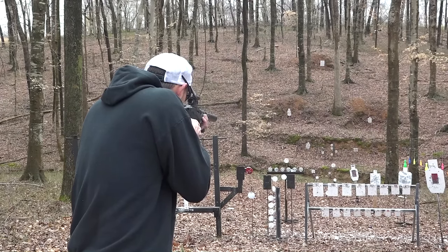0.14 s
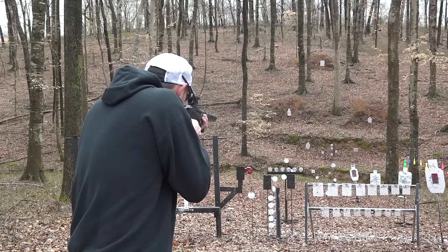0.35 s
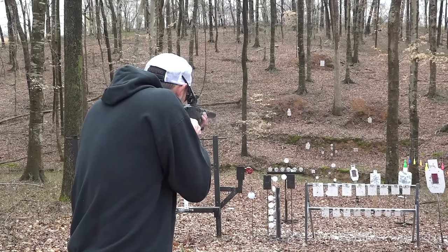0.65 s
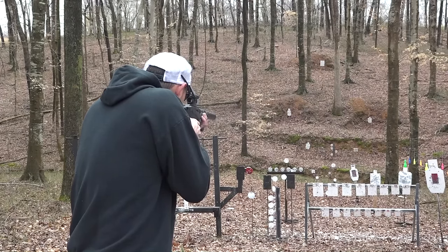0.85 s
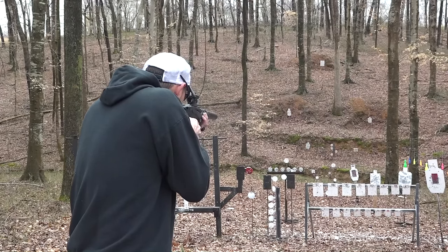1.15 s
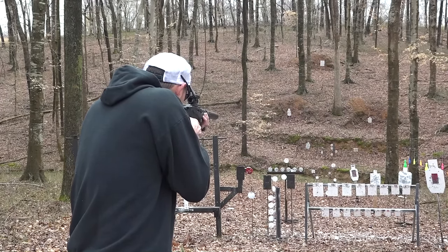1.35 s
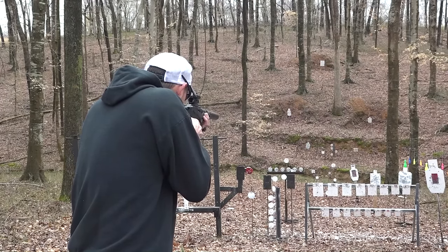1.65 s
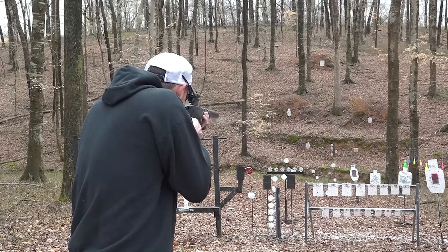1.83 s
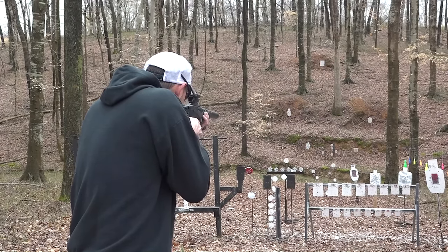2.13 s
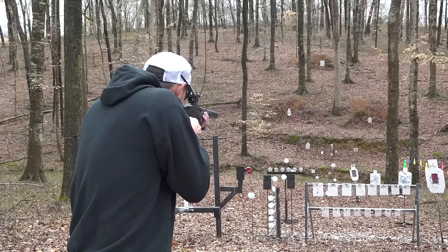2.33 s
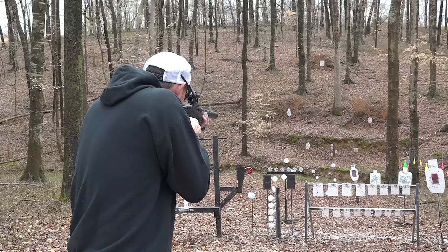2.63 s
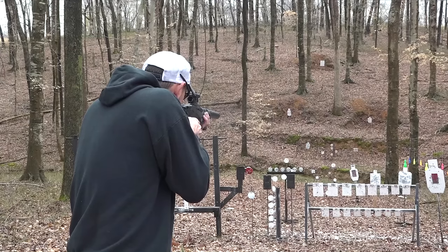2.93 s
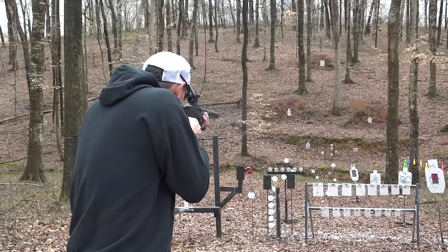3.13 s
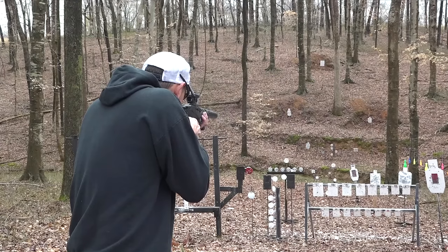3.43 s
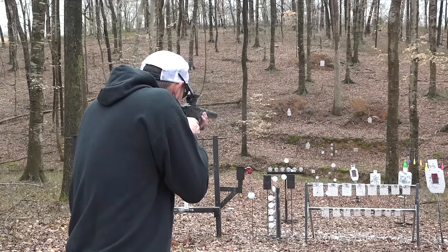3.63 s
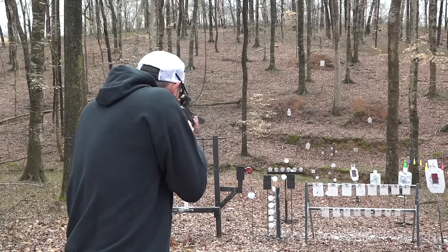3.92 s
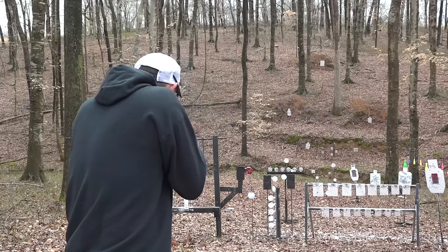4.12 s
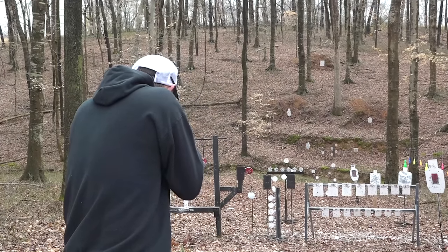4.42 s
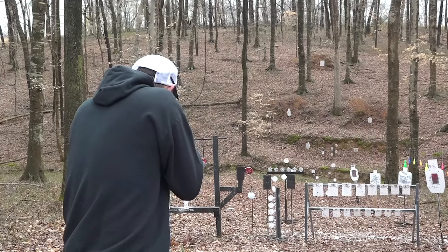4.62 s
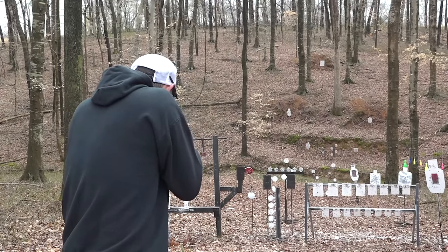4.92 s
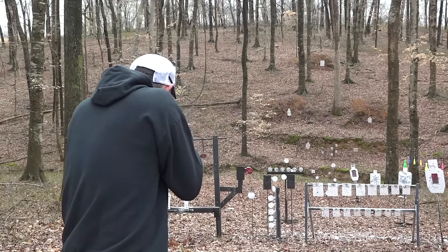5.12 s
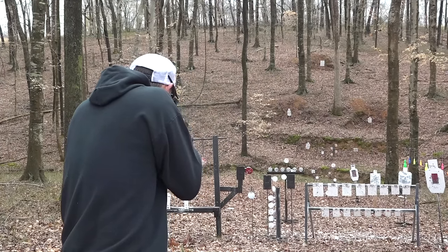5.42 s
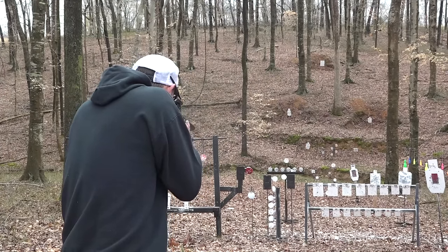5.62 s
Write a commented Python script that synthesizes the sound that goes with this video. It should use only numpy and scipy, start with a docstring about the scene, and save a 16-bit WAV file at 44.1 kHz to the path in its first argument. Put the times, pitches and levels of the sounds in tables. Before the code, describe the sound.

A suppressed semi-automatic gun fires six shots in the woods, with bullets pinging off distant metal plates, then clanging on nearer ones.

```python
"""Suppressed pistol and steel plates

A semi-automatic pistol is fired six times in a bare forest, while an earlier shot still echoes.
Each shot is a muzzle thump, a hiss of gas and the clatter of the bolt, close enough to overload the
microphone. Bullets excite the bending modes of near and far plates or land in the soil, spent cases
drop and ring, and trunks and hillside reflect the shots and hits."""
import sys
import numpy as np
from scipy import signal
from scipy.fft import rfft, irfft
from scipy.io import wavfile

SR = 44100
rng = np.random.default_rng(int(sys.argv[2]) if len(sys.argv) > 2 else 0)


def transcribe(signal):
    """Save signal, clipped to [-1, 1], as a 16-bit WAV file at the path in sys.argv[1]."""
    frames = np.atleast_2d(signal).T
    limited = np.clip(frames, -1, 1)
    pcm = np.round(limited * 32767).astype(np.int16)
    wavfile.write(sys.argv[1], SR, pcm)


N = 254016
LEAD = SR // 4  # samples before t = 0, which hold the earlier shot
BULLET_M_S, SOUND_M_S = 300, 343
TOP_HZ = 15900


def undb(db):
    """Amplitude ratio: tenfold for every 20 dB."""
    return 10 ** (np.asarray(db) / 20)


def clock(seconds):
    """Uniform sampling instants, t/s."""
    return np.arange(int(seconds * SR)) / SR


def fade(t, t60):
    """Exponential decay: 60 dB in the time t60."""
    return np.exp(-np.log(1000) * t / max(t60, 1e-3))


def add(track, start_s, sound):
    """Superposition on a track that begins LEAD samples before t = 0."""
    i = max(LEAD + int(round(start_s * SR)), 0)
    part = sound[:max(len(track) - i, 0)]
    track[i:i + len(part)] += part


def butterworth(x, hz, kind, order):
    """Filtering with a maximally flat passband."""
    return signal.sosfilt(signal.butter(order, np.minimum(hz, SR / 2 - 1), kind, fs=SR, output="sos"), x)


def log_frequencies(size):
    """Logarithmic frequency axis of a Fourier spectrum."""
    return np.log(np.maximum(np.fft.rfftfreq(size, 1 / SR), 1))


def spectral_gain(spectrum, size):
    """Spectral envelope through points (f/Hz, level/dB)."""
    hz, db = np.transpose(spectrum)
    return undb(np.interp(log_frequencies(size), np.log(hz), db))


def noise(spectrum, size):
    """Spectral shaping of white noise, scaled to unit rms."""
    x = irfft(rfft(rng.standard_normal(size)) * spectral_gain(spectrum, size), size)
    return x / x.std()


def burst(spectrum, db, t60):
    """A broadband transient: sudden onset, exponential decay."""
    t = clock(.25)
    return undb(db) * noise(spectrum, len(t)) * fade(t, t60)


def ring(modes, seconds, in_step=False):
    """Free vibration: damped modes (f/Hz, level/dB, T60/s), started in step or in random phase."""
    t = clock(seconds)
    return sum(undb(db) * fade(t, t60) * np.sin(2 * np.pi * (hz * t + (0 if in_step else rng.random())))
               for hz, db, t60 in modes)


# spectrum of the ambient air: f/Hz, level/dB
AIR = [(20, 1.5), (45, 0), (85, 4.5), (160, -5.5), (400, -5.5), (1000, -14.5), (2500, -12), (6000, -26),
       (15000, -26.5), (18000, -34.5)]


def air(db):
    """Ambient noise: stationary, and strongest in the bass."""
    return undb(db) * noise(AIR, N)


# scatter from the near trees and from the hillside: f/Hz, level/dB
THICKET = [(60, -35.5), (160, -44.5), (320, -27.5), (700, -29.5), (1500, -28), (3000, -24.5), (6500, -25),
           (10000, -19), (15000, -26.5)]
HILLSIDE = [(60, -38.5), (160, -41), (320, -27), (700, -28), (1500, -34), (3600, -30), (6500, -35),
            (10000, -49.5), (15000, -56.5)]


def forest(bass_t60=2.074, half_t60_hz=8500, hill_s=0.23, hill_rise_s=0.033, patchy_db=1.0, bands=10):
    """Reverberation: near trees scatter at once, the hillside late; air absorption shortens the treble."""
    t = clock(1.3)
    patches = undb(patchy_db * np.interp(t, np.linspace(0, 2, 400), rng.standard_normal(400)))
    scatter = rfft(rng.standard_normal(len(t)) * patches)
    near = scatter * spectral_gain(THICKET, len(t))
    far = 1j * scatter * spectral_gain(HILLSIDE, len(t))  # in quadrature, so the two add in power
    rise = (1 + np.tanh((t - hill_s) / hill_rise_s)) / 2
    centres_hz = np.geomspace(500, TOP_HZ, bands)
    response = 0
    for weights, hz in zip(np.eye(bands), centres_hz):
        band = np.interp(log_frequencies(len(t)), np.log(centres_hz), weights)
        t60 = bass_t60 / (1 + (hz / half_t60_hz) ** 2)
        trees = irfft(near * band, len(t))
        hill = irfft(far * band, len(t)) * rise / fade(hill_s, t60)
        response += fade(t, t60) * (trees + hill)
    return response / np.sqrt(SR)


# single trunks and, last, the ridge: distance/m, lower f/Hz, upper f/Hz
REFLECTORS = [(14.7, 1400, 3800), (17.3, 1200, 3200), (21.3, 2400, 4400), (26.1, 900, 2400),
              (33.8, 2900, 4600), (89.6, 800, 1700)]


def trunks(blast, nearest_db=-36, loss_db_per_doubling=4.0):
    """Discrete reflection: each obstacle returns one band after the round trip, weaker with distance."""
    out = np.zeros(LEAD + N)
    for metres, low_hz, high_hz in REFLECTORS:
        db = nearest_db - loss_db_per_doubling * np.log2(metres / REFLECTORS[0][0])
        echo = undb(db) * butterworth(blast, [low_hz, high_hz], "bandpass", order=2)
        add(out, 2 * metres / SOUND_M_S - LEAD / SR, echo)  # the blast already includes the lead
    return out


# spectrum of a dull knock: f/Hz, level/dB
KNOCK = [(40, -17), (150, -5.5), (400, 11), (900, 15), (1500, -9.5), (2500, -35.5), (8000, -22.5),
         (16000, -33.5)]
# knocks just before a shot: t/s, level/dB
KNOCKS = [(0.5579, -38), (4.704, -54)]


def handling():
    """Heavily damped impacts: the gun knocks as it is handled."""
    out = np.zeros(LEAD + N)
    for start_s, db in KNOCKS:
        add(out, start_s, burst(KNOCK, db, t60=.055))
    return out


# spectrum of a brass tick: f/Hz, level/dB
BRASS = [(60, 9), (500, 11), (1500, -3.5), (3000, 8), (6000, 9), (10000, 4.5), (13500, 6.5), (16000, 2)]
# flight of each shot's spent case: duration/s
CASE_FLIGHTS_S = [.15, .151, .151, .138, .15, .15, .15]
# stray cases bouncing on something hard: t/s, tick level/dB, ring level/dB
STRAY_CASES = [(.367, -37, -50.5), (4.1685, -43, -76), (5.557, -69, -60.5)]


def spent_cases(mode_hz=11680, beat_hz=55, ring_t60=0.21, landing_tick_db=-33, landing_ring_db=-64):
    """Beats: a brass case lands with a tick and rings in two closely spaced modes."""
    out = np.zeros(LEAD + N)
    landings = [(shot_s + flight_s, landing_tick_db, landing_ring_db)
                for (shot_s, *_), flight_s in zip(SHOTS, CASE_FLIGHTS_S)]
    for start_s, tick_db, ring_db in landings + STRAY_CASES:
        modes = [(mode_hz, ring_db, ring_t60), (mode_hz + beat_hz, ring_db - 10, ring_t60)]
        add(out, start_s, burst(BRASS, tick_db, t60=0.014))
        add(out, start_s, ring(modes, seconds=.5))
    return out


# spectrum of a bursting bullet: f/Hz, level/dB
SPLASH = [(40, -24.5), (200, -18.5), (700, -3), (1300, -2), (2000, -5), (3200, -4.5), (5500, -2.5),
          (9000, -10.5), (13000, -18), (16000, -23)]
# impact on each target: crack T60/s, thud level/dB, spray level/dB (both re the crack, before filtering)
SURFACES = {"near": (0.01, 6.3, -20.5), "wide": (0.011, -2.5, -24.5), "heavy": (0.099, 8, -12),
            "far": (0.054, 4, -17), "bank": (0.037, 3.5, -18.5)}


def impact(target, db):
    """Inelastic collision: a bullet bursts with a crack, a thud and a spray of fragments into leaves."""
    crack_t60, thud_db, spray_db = SURFACES[target]
    thud = butterworth(burst(SPLASH, db + thud_db, t60=.03), [900, 1600], "bandpass", order=2)
    fragments = butterworth(noise(SPLASH, SR), 6500, "lowpass", order=3)
    spray = undb(db + spray_db) * fragments * fade(clock(1), t60=1.0)
    return [burst(SPLASH, db, crack_t60), thud, spray]


def hanging_plate(modes, swing_hz=1.5, lobes_per_khz=1.6, doppler_per_khz=0.21, clang_db=-11,
                  flutter=0.53, flutter_hz=32):
    """Directivity: a twisting plate sweeps each mode's lobes past the listener, the high ones fastest."""
    t = clock(1.3)
    twist = np.sin(2 * np.pi * swing_hz * t)
    out = 0
    for hz, db, t60 in modes:
        khz = hz / 1000
        lobe = 1 + .55 * np.cos(lobes_per_khz * khz * twist * (.5 + rng.random()))
        # each mode wavers irregularly in level and pitch
        knots = rng.standard_normal((2, 160))
        tremble, waver = (flutter * np.interp(t * flutter_hz, np.arange(len(k)), k) for k in knots)
        # the first violent flexing is brighter and is soon damped by the hanger
        decay = fade(t, t60) + undb(clang_db) * np.sqrt(khz) * fade(t, t60=0.37)
        phase = 2 * np.pi * (hz * t + rng.random()) + doppler_per_khz * khz * twist + np.sqrt(khz) * waver
        out += undb(db) * decay * lobe * (1 + tremble) * np.sin(phase)
    return out


def shimmer(db, low_hz=2500, high_hz=14500, longest_t60=0.17, count=70):
    """High modal density: a plate's many weak upper modes, the higher the shorter."""
    modes = [(hz, 0, longest_t60 * np.sqrt(low_hz / hz)) for hz in rng.uniform(low_hz, high_hz, count)]
    return undb(db) * ring(modes, seconds=1.0) / np.sqrt(count / 2)


def bloom(sound, rise_s=0.0025):
    """Finite wave speed: the sound builds up as bending waves spread over the plate."""
    t = np.arange(len(sound)) / SR
    return sound * (1 - np.exp(-t / rise_s))


# modes of the small far plate: f/Hz, T60/s, level/dB struck at the centre, level/dB struck near the rim
FAR_PLATE = [(778, .7, -55, -56), (1311, .7, -50, -56), (1568, 1.8, -57, -52), (2217, 1.5, -56, -50),
             (3044, .9, -51, -31), (4286, 1.25, -37, -58), (4413, 1.3, -65, -44), (5079, .75, -19, -43),
             (5322, 1, -43, -44), (6567, .5, -62, -46), (6940, .8, -49, -54), (8400, .65, -38, -46),
             (8815, .35, -34, -40), (9249, .3, -35, -55), (9356, .2, -33, -60), (9908, .5, -47, -60),
             (10360, .55, -42, -44), (11570, .35, -46, -47), (12050, .5, -56, -48), (12590, .45, -52, -47),
             (13470, .35, -45, -58)]
# modes of the larger plates: f/Hz, level/dB, T60/s
HEAVY_PLATE = [(737, -52, .8), (1190, -51, .7), (1455, -48, .55), (2358, -66, 1), (3467, -63, 1),
               (4355, -59, 1), (5464, -59, .7), (5803, -61, .8), (6589, -60, .7)]
NEAR_PLATE = [(800, -47, .6), (1540, -43, .4), (2335, -58, 1.2), (2806, -48, .5), (4418, -39, 1.3),
              (4766, -46, .35), (5580, -34, .3), (6604, -43, .3), (7400, -45, .6), (7778, -42, .5),
              (8533, -42, .6), (8969, -48, .4), (9410, -45, .35), (9750, -36, .3), (10610, -52, .55),
              (13030, -45, .22), (13818, -42, .25), (14520, -47, .2)]
WIDE_PLATE = [(711, -40, .25), (1351, -38, .3), (1795, -41, .7), (3002, -35, 1.1), (3607, -36, .3),
              (4672, -46, .7), (5193, -34, .6), (5464, -32, .4), (7708, -44, .5), (8369, -41, .35),
              (8637, -32, .5), (11880, -46, .25), (11985, -38, .2), (12280, -50, .35), (12740, -48, .4),
              (13580, -51, .3), (14118, -43, .14)]
# each larger plate: modes, shimmer level/dB
BIG_PLATES = {"heavy": (HEAVY_PLATE, -46), "near": (NEAR_PLATE, -19), "wide": (WIDE_PLATE, -18)}


def steel_ring(target, db, place, far_shimmer_db=-34):
    """Modal excitation: a struck plate rings; on the small one the point of impact weights the modes."""
    if target == "far":
        modes = [(hz, db + centre + place * (rim - centre), t60) for hz, t60, centre, rim in FAR_PLATE]
        tones = hanging_plate(modes, swing_hz=1.2, lobes_per_khz=0.36, doppler_per_khz=0.067, clang_db=-24)
        shimmer_db = far_shimmer_db
    else:
        modes, shimmer_db = BIG_PLATES[target]
        tones = undb(db) * hanging_plate(modes)
    return [bloom(tones), bloom(shimmer(db + shimmer_db))]


# the plates and the earth bank: distance/m
RANGE_M = {"near": 8.43, "wide": 8.45, "heavy": 41.8, "far": 42.15, "bank": 43.9}


def heard_after(target):
    """Travel time in seconds: the bullet flies out, the sound comes back."""
    return RANGE_M[target] / BULLET_M_S + RANGE_M[target] / SOUND_M_S


# one bullet per shot: target, impact level/dB, ring gain/dB, place (0 centre, 1 rim),
# level/dB in the bank if it glances on
BULLETS = [("bank", -35.5, 0, 0, None), ("heavy", -31, 0, 0, None), ("far", -25.5, .5, 0.22, None),
           ("far", -37.5, -24.5, 0.039, -33), ("far", -27.5, 0, 0.89, None), ("near", -20.5, 0.67, 0, None),
           ("wide", -16.5, 0.96, 0, None)]


def targets(impact_wet_db=27, ring_wet_db=21, wet_db_per_doubling=0.5):
    """Direct and reverberant sound: the share of a plate's ring sent to the forest grows with range."""
    arrivals = []
    for (shot_s, *_), (target, impact_db, ring_db, place, bank_db) in zip(SHOTS, BULLETS):
        hit_s = shot_s + heard_after(target)
        arrivals += [(hit_s, part, impact_wet_db) for part in impact(target, impact_db)]
        if target != "bank":
            wet_db = ring_wet_db + wet_db_per_doubling * np.log2(RANGE_M[target] / RANGE_M["near"])
            arrivals += [(hit_s, part, wet_db) for part in steel_ring(target, ring_db, place)]
        if bank_db is not None:
            bank_s = shot_s + heard_after("bank")
            arrivals += [(bank_s, part, impact_wet_db) for part in impact("bank", bank_db)]
    direct, into_forest = np.zeros((2, LEAD + N))
    for start_s, sound, wet_db in arrivals:
        add(direct, start_s, sound)
        add(into_forest, start_s, undb(wet_db) * sound)
    return direct, into_forest


# spectrum of steel striking steel: f/Hz, level/dB
CLASH = [(30, -17), (70, -3.5), (140, -14), (500, -2.5), (1500, -5.5), (2500, -0.5), (4000, -1),
         (6000, 4.5), (9000, 0), (13000, 3), (16000, -10)]
# modes of the frame and suppressor tube: f/Hz, level/dB, T60/s
FRAME = [(565, -8, 0.039), (610, -9.5, 0.031), (1021, -5, 0.064), (1223, -21, 0.077), (2242, -8.5, 0.036),
         (2260, -10.5, 0.024), (3350, -6.5, 0.012), (3400, 5, 0.0056), (3970, -4.5, 0.023),
         (5480, -9.5, 0.022), (6600, -17.5, 0.036), (8150, -10, 0.06), (8450, -12.5, .04),
         (9140, -7, 0.046)]
# striker, unlocking, rear stop, rebound, feeding, closing:
# fraction of the bolt cycle, snap level/dB, clash level/dB, clash T60/s
BLOWS = [(-.078, -34.5, -25, 0.043), (-.018, -18.5, -11, 0.0061), (0.168, -2.5, -11, .018),
         (0.327, -12, -13.5, .052), (0.656, -10.5, -15, .042), (0.993, -17, -24.5, .03)]


def bolt(snap_t60=0.0058, detune=0.012, ring_db=-9, bright_hz=15000, dulling_octaves=2.5):
    """Impact excitation: each blow snaps, clashes and rings the frame, duller as the bolt slows."""
    out = np.zeros(LEAD + N)
    for shot_s, _, return_db, cycle_s in SHOTS:
        for fraction, snap_db, clash_db, clash_t60 in BLOWS:
            blow_s = shot_s + fraction * cycle_s
            gain = undb(return_db if fraction > .5 else 0)
            cutoff_hz = bright_hz / 2 ** (dulling_octaves * fraction ** 2)
            contact = burst(CLASH, snap_db, snap_t60) + burst(CLASH, clash_db, clash_t60)
            # slight random detuning at each blow makes the clatter less pitched
            modes = [(hz * (1 + detune * rng.standard_normal()), snap_db + ring_db + db, t60)
                     for hz, db, t60 in FRAME]
            add(out, blow_s, gain * butterworth(contact, cutoff_hz, "lowpass", order=1))
            add(out, blow_s, gain * ring(modes, seconds=.2, in_step=True))
    return out


# spectrum of escaping gas: f/Hz, level/dB
GAS = [(30, -12), (70, -10), (120, -15), (300, 3), (640, 8.5), (1400, -4), (2400, -5), (3600, 3.5),
       (6000, 2.5), (9000, -1.5), (13000, -1), (16000, -6)]
# puffs from the muzzle, from the opening breech, and their ground reflection:
# delay/s, pulse level/dB, lower f/Hz, upper f/Hz, hiss level/dB, hiss T60/s
PUFFS = [(.0002, 7.5, 210.5, 915, 1.5, 0.02), (.0033, -5, 418, 1017, -1.5, 0.0077),
         (0.0111, -14.5, 400, 893, -15.5, .02)]
# shots: t/s, muzzle gain/dB, gain of the bolt's return stroke/dB, bolt cycle/s
SHOTS = [(-.0945, 3, 1, 0.04), (0.6547, 2, 1, 0.053), (1.8552, 1.5, -0.5, 0.055), (2.7334, 1.5, 1.5, 0.05),
         (3.5031, 1.5, 2.5, .0508), (4.7334, 2, 3, .052), (5.1472, 0, -0.5, .0505)]


def muzzle():
    """Gas expansion: the suppressor frees a slow pressure pulse and a hiss; breech and ground follow."""
    out = np.zeros(LEAD + N)
    for delay_s, pulse_db, low_hz, high_hz, hiss_db, hiss_t60 in PUFFS:
        pulse = butterworth(signal.unit_impulse(SR // 4), [low_hz, high_hz], "bandpass", order=2)
        pulse *= undb(pulse_db) / abs(pulse).max()
        for shot_s, db, *_ in SHOTS:
            add(out, shot_s + delay_s, undb(db) * (pulse + burst(GAS, hiss_db, hiss_t60)))
    return out


def scene(air_db=-67, width_db=-27, side_air_db=-13):
    """Superposition: the close gun is nearly dry; the targets carry more forest echo."""
    blast = muzzle()
    hits, hits_into_forest = targets()
    gun = blast + bolt()
    echo = signal.fftconvolve(gun + hits_into_forest, forest())[:LEAD + N]
    mid = (gun + hits + spent_cases() + handling() + trunks(blast) + echo)[LEAD:] + air(air_db)
    # two ports almost side by side differ only by the pressure gradient and a little air noise
    side = undb(width_db) * np.gradient(mid) + air(air_db + side_air_db)
    return np.array([mid + side, mid - side])


def record(dry, ceiling=0.94, low_cut_hz=50, left_bias_db=.22):
    """Overload and band limiting: peaks clip flat, deep bass and top are cut, the left is favoured."""
    balance = undb([[left_bias_db], [-left_bias_db]])
    clipped = np.clip(dry, -ceiling, ceiling)
    thinned = balance * butterworth(clipped, low_cut_hz, "highpass", order=2)
    return signal.sosfiltfilt(signal.ellip(8, .1, 50, TOP_HZ, fs=SR, output="sos"), thinned)


dry = scene()
out = record(dry)
transcribe(out)
```